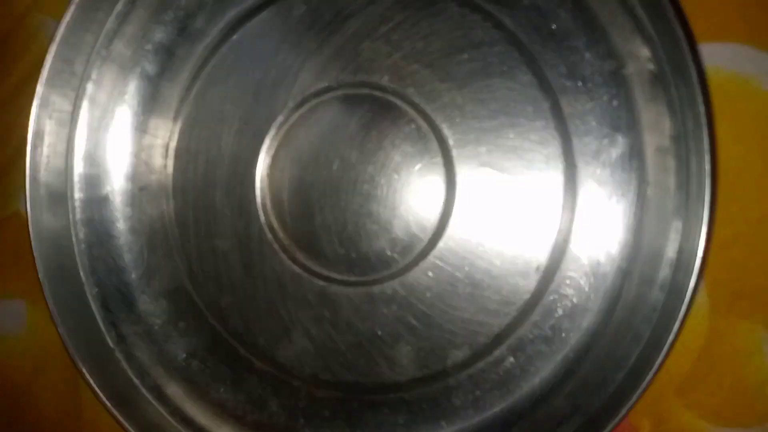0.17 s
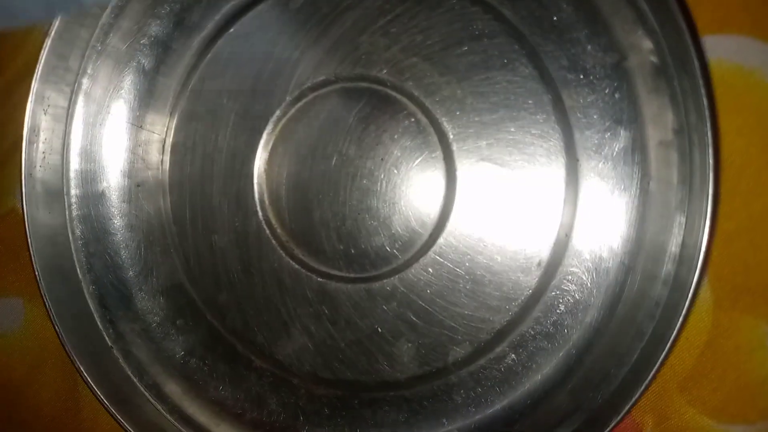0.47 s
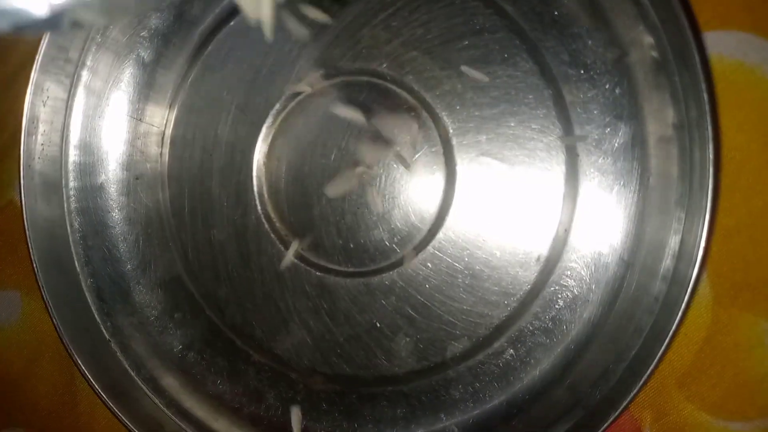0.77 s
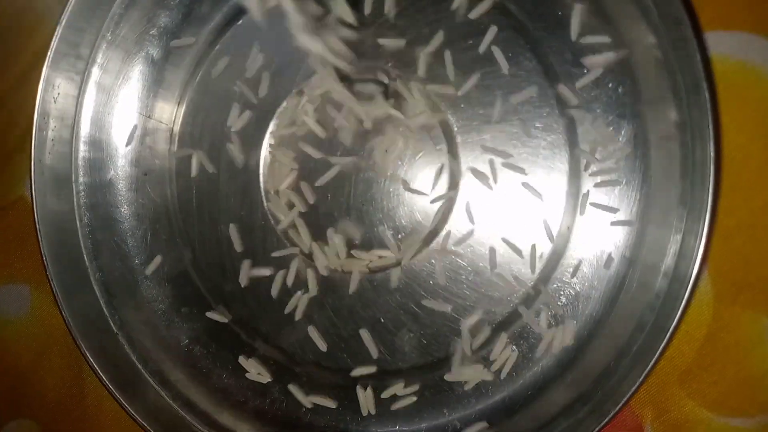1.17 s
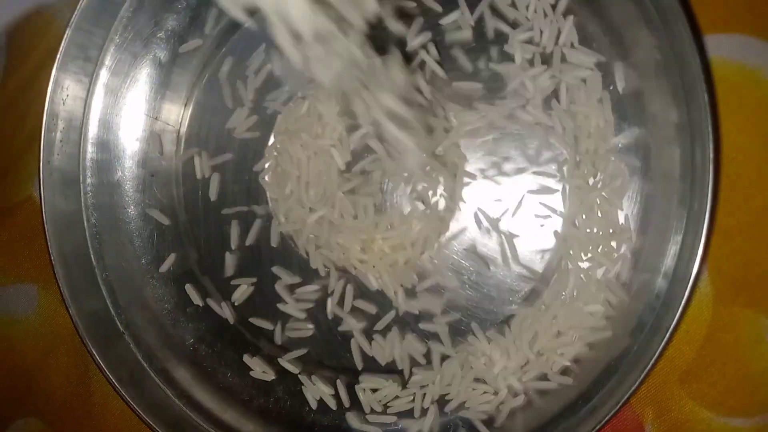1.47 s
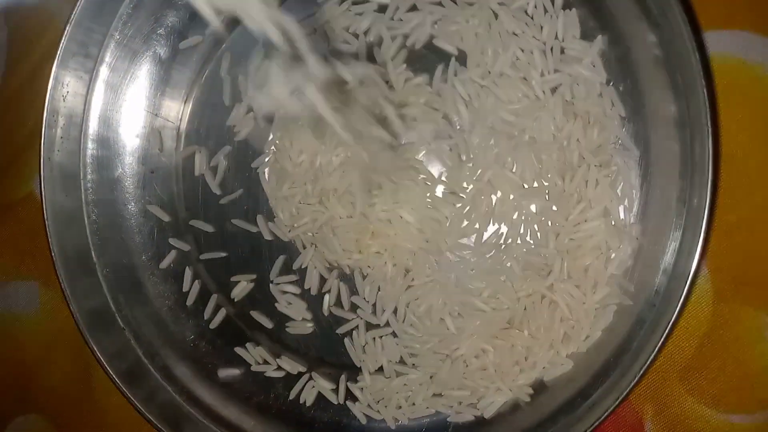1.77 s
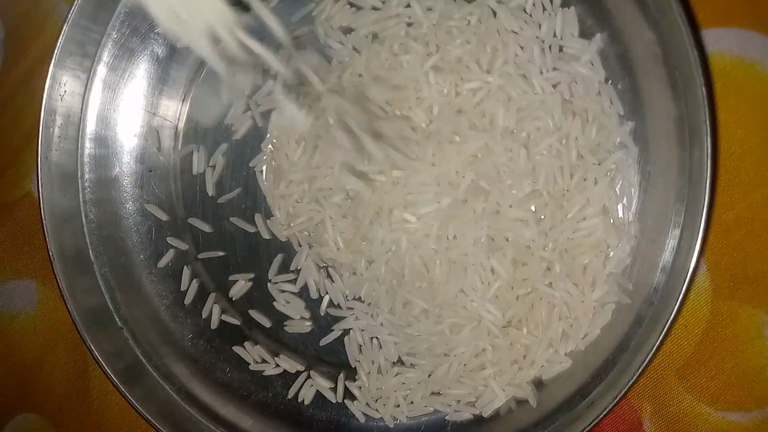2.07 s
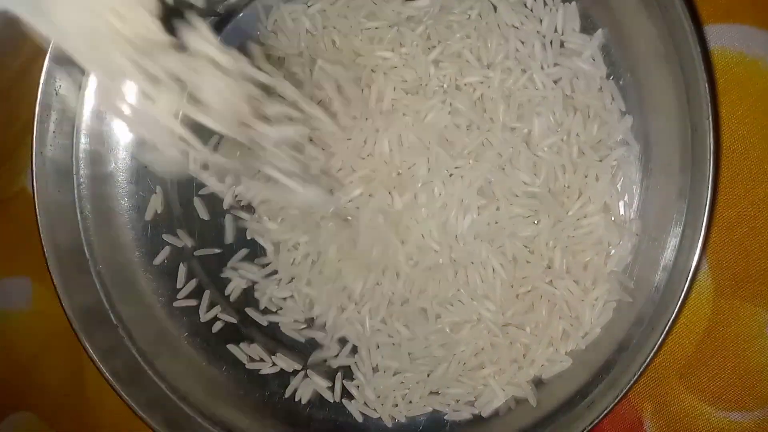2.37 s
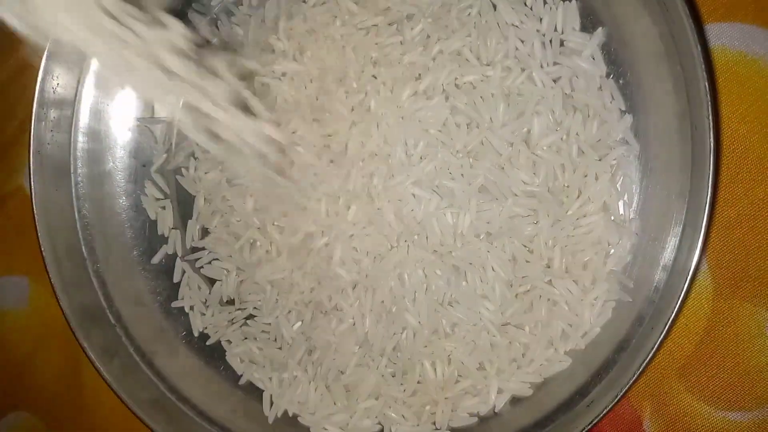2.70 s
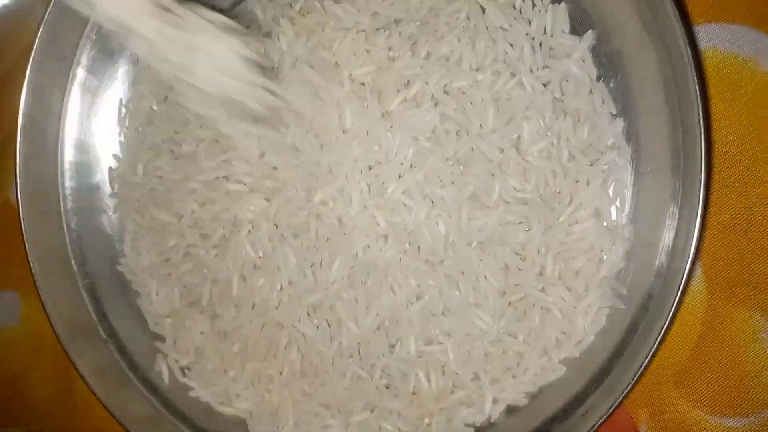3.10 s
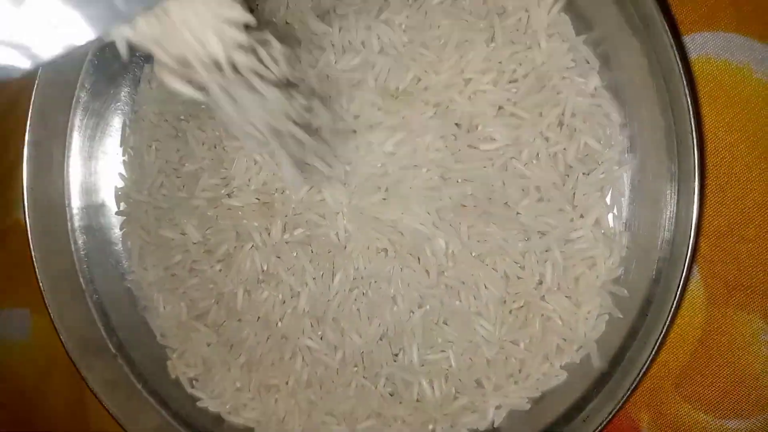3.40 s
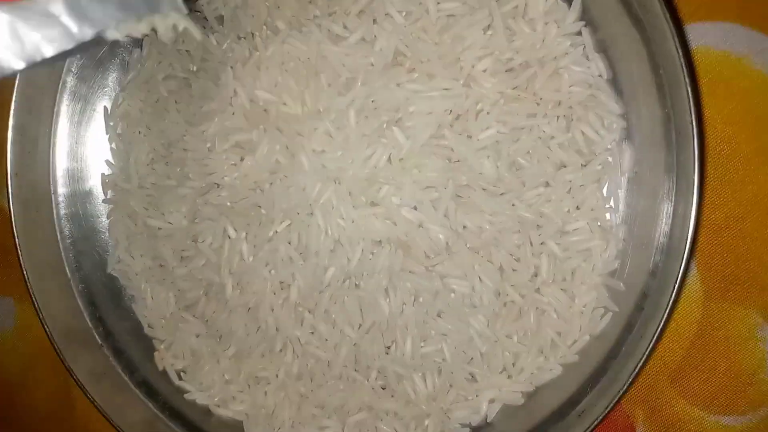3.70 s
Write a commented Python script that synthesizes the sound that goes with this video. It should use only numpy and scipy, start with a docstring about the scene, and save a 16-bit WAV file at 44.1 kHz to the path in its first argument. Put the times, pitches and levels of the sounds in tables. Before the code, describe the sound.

Dry rice is poured into a steel bowl, close to a phone microphone indoors: a thin bag crackles first, grains tick and ring on bare metal, then a dense hissing patter on rice thins to a trickle.

```python
"""Indoors, close under a phone microphone: dry rice is tipped from a crackling bag into an empty steel bowl.
The bag and the grains are random impacts that shape noise bursts or excite ringing modes.
The first grains ring the bare steel; as the heap grows they patter on rice, and strays ring the rim.
A few hollow low bumps from handling are decaying sines, over a faint room rumble of wavering noise."""
import sys
import numpy as np
from scipy import signal
from scipy.fft import rfft, irfft
from scipy.io import wavfile
from scipy.ndimage import uniform_filter1d

SR = 44100
rng = np.random.default_rng(int(sys.argv[2]) if len(sys.argv) > 2 else 0)


def dump_mix(stems):
    """Bounce the given channels to the path in sys.argv[1] as a 16-bit WAV at rate SR."""
    frames = np.atleast_2d(stems).T  # one column per channel
    limited = np.clip(frames, -1, 1)  # hard clip at full scale
    pcm = np.round(limited * 32767).astype(np.int16)
    wavfile.write(sys.argv[1], SR, pcm)


def volts_from_db(level):
    """Convert decibel levels to linear amplitude ratios."""
    exponent = np.asarray(level, float) / 20
    return 10 ** exponent


N = 169785  # samples


def track(rows, fade_s=0.017):
    """Gain along (time [s], level [dB]) rows, fading out beyond both ends."""
    t, db = np.array(rows, float).T
    times = np.r_[t[0] - fade_s, t, t[-1] + fade_s]
    levels = np.r_[-120, db, -120]
    return volts_from_db(np.interp(np.arange(N) / SR, times, levels))


def unit(x):
    """Scale to rms 1."""
    return x / np.sqrt(np.mean(x ** 2))


def colour(x, points):
    """Shape a spectrum by (frequency [Hz], level [dB]) points, then scale to rms 1."""
    hz, db = np.array(points, float).T
    f = np.arange(len(x) // 2 + 1) * SR / len(x) + 1  # + 1 avoids log(0)
    gain = volts_from_db(np.interp(np.log(f), np.log(hz), db))
    return unit(irfft(rfft(x) * gain, len(x)))


def walk(rate):
    """Slewed random levels of rms 1, with rate [1/s] new values."""
    k = int(SR / rate)
    steps = np.repeat(rng.standard_normal(N // k + 1), k)[:N]
    return unit(uniform_filter1d(steps, k))


# the stream thins with this time constant to this share of its grains
TRICKLE_FROM_S, TRICKLE_S, TRICKLE_SHARE = 3.52, 0.12, 0.25


def stream(time_s):
    """1 while the rice flows fully, then falling away exponentially."""
    return np.exp(-np.maximum(np.arange(N) / SR - TRICKLE_FROM_S, 0) / time_s)


def impacts(rate, spread_db, clump_db, clump_rate):
    """Random impacts, rate [1/s] in full flow: many small, few large, in clumps; fewer in the trickle."""
    chance = rng.random((2, N))
    clumps = walk(clump_rate)
    clumps = clumps - uniform_filter1d(clumps, SR // 10)  # only the quick bunching
    size_db = np.minimum(-spread_db * np.log(1 - chance[1]), 4 * spread_db)
    size = volts_from_db(size_db + clump_db * clumps)
    flow = np.maximum(stream(TRICKLE_S), TRICKLE_SHARE)
    return (chance[0] < rate / SR * flow) * size


def patter(hits, tail_s, points):
    """Each impact is a short burst of noise that swells and dies."""
    pole = np.exp(-2 / (tail_s * SR))
    power = signal.lfilter([1], [1, -2 * pole, pole ** 2], hits ** 2 + 1e-30)
    return colour(np.sqrt(np.abs(power)) * rng.standard_normal(N), points)


def ring(x, hz, width_hz):
    """One mode as a complex resonator; a unit impulse rings with peak near 1."""
    pole = np.exp((2j * hz - width_hz) * np.pi / SR)
    return signal.lfilter([1], [1, -pole], x + 1e-18).imag


def steel(hits, modes):
    """Every impact excites each (Hz, width [Hz], dB) mode by its own chance amount."""
    return sum(volts_from_db(db) * np.sqrt(width_hz) * ring(hits * rng.standard_normal(N), hz, width_hz)
               for hz, width_hz, db in modes)


def snaps(rows, tail_s, width, edge_db, points):
    """Single snaps: a ringing centre, its width a share of its frequency, plus a broad edge."""
    out, lead = np.zeros(N), 32  # lead [samples] leaves room for the edge's spread ahead of the snap
    t = (np.arange(1024) - lead) / SR
    for (s, db, hz), noise in zip(rows, rng.standard_normal((len(rows), len(t)))):
        push = np.diff(noise * np.exp(-t / tail_s) * (t >= 0), prepend=0)
        centre = unit(ring(push, hz, width * hz))
        burst = centre + volts_from_db(edge_db) * colour(push, points)
        burst = volts_from_db(db) * burst / np.abs(burst).max()
        i = int(s * SR) - lead
        out[i:i + len(t)] += burst[:N - i]
    return out


def room_tail(near):
    """The room answers the close sounds with noise that decays by 60 dB in 0.12 s."""
    t = np.arange(8192) / SR
    tail = rng.standard_normal(len(t)) * np.exp(-np.log(1000) * t / 0.12) * (t > 0.002)
    return signal.fftconvolve(near, tail / np.sqrt(np.sum(tail ** 2)))[:N]


# low rumble of room and handling before it wavers: (time [s], level [dB])
RUMBLE_LEVEL = [(0.06, -59), (0.8, -63), (1.5, -70), (2.2, -50.5), (3.55, -59), (3.85, -63)]
# its spectrum: (frequency [Hz], relative density [dB per Hz])
ROOM_COLOUR = [(40, -36), (125, -9.5), (200, -2.5), (290, 4.5), (400, -0.5), (520, -20), (1000, -43)]
# deepest rumble before it wavers: (time [s], level [dB])
DEEP_LEVEL = [(0.1, -68), (1.45, -84.5), (2.2, -71), (3.85, -73)]


def rumble():
    """Low room and handling noise that wavers; its deepest part, a noise-fed resonance, comes in puffs."""
    low = track(RUMBLE_LEVEL) * volts_from_db(-2.0 + 2.5 * walk(14.0))
    low = low * colour(rng.standard_normal(N), ROOM_COLOUR)
    puffs = track(DEEP_LEVEL) * volts_from_db(5.4 * walk(18.0))
    deep = unit(ring(ring(rng.standard_normal(N), 82.0, 36.0), 82.0, 36.0))
    return low + puffs * deep


# handling bumps: (time [s], level before swell and decay [dB], frequency [Hz], 60 dB decay time [s])
BUMPS = [(0.26, -21, 760, 0.013), (0.285, -45, 65, .2), (0.39, -39, 80.6, 0.12), (0.52, -48, 200, 0.34),
         (0.565, -38.5, 204, 0.22), (0.633, -15.5, 680, 0.0085), (0.67, -47, 197, 0.51),
         (1.066, -46, 180, 0.375), (1.218, -24.5, 476, 0.012), (2.02, -48.5, 191.3, 0.49),
         (2.235, -47, 75, .2), (2.902, -31, 286, 0.19)]


def bumps():
    """Soft pushes into hollow low resonances: sines that swell quickly and decay."""
    out = np.zeros(N)
    for s, db, hz, t60 in BUMPS:
        t = np.maximum(np.arange(N) / SR - s, 0)
        swell = 1 - np.exp(-2 * t * hz)
        decay = np.exp(-np.log(1000) * t / t60)
        out += volts_from_db(db) * swell * decay * np.sin(2 * np.pi * hz * t)
    return out


# rustle of the bag: (time [s], level [dB])
BAG_LEVEL = [(0.045, -52), (0.07, -41), (0.14, -36), (0.22, -26), (0.3, -31), (0.435, -31), (0.51, -26),
             (0.55, -31.5), (0.595, -25), (0.645, -29.5), (0.74, -25.5), (0.83, -28), (0.93, -31.5),
             (1.02, -42.5)]
# spectrum of the bag's rustle as the phone microphone hears it, with the microphone's resonance
# near 15 kHz: (frequency [Hz], relative density [dB per Hz])
BAG_COLOUR = [(200, -20), (540, -21.5), (1500, -13), (3200, -6.5), (3750, -2.5), (4250, -2.5), (4900, -7),
              (6300, -7.5), (8500, -19), (12500, -33.5), (15000, -22), (15900, -38)]
# loudest crackles of the bag: (time [s], peak level [dB], centre frequency [Hz])
CRACKLES = [(0.149, -14.5, 6130), (0.216, -19, 4500), (0.261, -11, 4000), (0.272, -9.5, 3800),
            (0.287, -14.5, 3050), (0.329, -10.5, 4400), (0.354, -11.5, 4260), (0.363, -15, 4300),
            (0.382, -10, 5900), (0.423, -8, 2700), (0.533, -16, 3960), (0.612, -14, 4200),
            (0.635, -7.5, 6860)]


def bag():
    """Thin film rustles and crackles as it tips."""
    hits = impacts(3000.0, spread_db=3.2, clump_db=1.8, clump_rate=70.0)
    rustle = track(BAG_LEVEL) * patter(hits, 0.0004, BAG_COLOUR)
    return rustle + snaps(CRACKLES, 0.00038, 0.16, edge_db=2, points=BAG_COLOUR)


# modes of the bare rim, the last two high: (frequency [Hz], width [Hz], relative level [dB])
RIM_MODES = [(6625, 50, 0), (6980, 65, -6), (7270, 75, -3), (7620, 60, -5), (7960, 50, -14),
             (14910, 80, -9), (15680, 100, -15)]
# spills on the rim: (time [s], drive level [dB], time to peak [s], extra drive of the high modes [dB])
RIM_SPILLS = [(2.847, -24.5, 0.0021, 7), (2.961, -31.5, 0.02, 10), (3.019, -26.5, .003, -8),
              (3.044, -32.5, 0.013, -2), (3.137, -25, 0.0091, 0), (3.47, -37, .002, 23),
              (3.57, -45, 0.0046, 25), (3.666, -34, 0.0065, 4)]


def rim():
    """Short spills of grains reach the bare rim and ring it."""
    t, low, high = np.arange(N) / SR, 0, 0
    for s, db, rise_s, high_db in RIM_SPILLS:
        age = np.maximum(t - s, 0) / rise_s
        spill = volts_from_db(db) * age * np.exp(1 - age)
        low = low + spill
        high = high + spill * volts_from_db(high_db)
    grains = impacts(4000.0, spread_db=1.5, clump_db=0.5, clump_rate=90.0) / np.sqrt(SR / 100)
    return steel(low * grains, RIM_MODES[:5]) + steel(high * grains, RIM_MODES[5:])


# grains landing on the heap: (time [s], level [dB])
HEAP_LEVEL = [(0.9, -45), (1.1, -35), (1.6, -39.5), (2.05, -32.5), (2.2, -30), (2.45, -29), (2.7, -32),
              (2.85, -34.5), (2.93, -32), (3.1, -35.5), (3.3, -31.5), (3.45, -28), (3.55, -36.5),
              (3.65, -37), (3.85, -36.5)]
# spectrum of grain on grain through the phone microphone, which resonates near 15 kHz:
# (frequency [Hz], relative density [dB per Hz])
RICE_COLOUR = [(250, -20.5), (450, -16.5), (1170, -11.5), (1530, -8), (3280, -2.5), (4200, -2), (7000, -9),
               (10000, -28), (13300, -27), (14800, -14.5), (15900, -22.5)]
# single grains on the heap: (time [s], peak level [dB], centre frequency [Hz])
SINGLE_GRAINS = [(1.224, -28, 1440), (3.175, -18, 4080), (3.401, -14, 3450), (3.417, -16, 3980),
                 (3.441, -12, 4020), (3.747, -25, 2830), (3.754, -25.5, 1640), (3.797, -27.5, 4500),
                 (3.841, -22, 1650)]
HEAP_THUD_BELOW_HZ = 750  # only a full stream pushes the heap hard enough to sound below this


def heap():
    """Grains patter on grains; the low thud fades faster than the stream thins."""
    hits = impacts(1800.0, spread_db=2.0, clump_db=1.5, clump_rate=55.0)
    grains = patter(hits, 0.0016, RICE_COLOUR)
    high_pass = signal.butter(4, HEAP_THUD_BELOW_HZ, "high", fs=SR, output="sos")
    ticks = signal.sosfiltfilt(high_pass, grains)
    thud = stream(TRICKLE_S / 2) * (grains - ticks)
    singles = snaps(SINGLE_GRAINS, 0.00054, 0.21, edge_db=-8.0, points=RICE_COLOUR)
    return track(HEAP_LEVEL) * (ticks + thud) + singles


# grains landing on the bare floor of the bowl: (time [s], drive level [dB])
FLOOR_DRIVE = [(0.69, -43), (0.7, -33), (0.735, -43), (0.757, -30), (0.78, -31), (0.835, -38.5),
               (0.848, -24), (0.88, -36), (0.895, -28), (0.935, -31), (1.0, -27), (1.6, -27.5),
               (1.9, -29.5), (2.1, -35.5), (2.5, -31), (2.7, -36.5), (3.5, -45), (3.77, -43.5)]
# modes of the bowl floor: (frequency [Hz], relative level [dB])
FLOOR_MODES = [(3300, -9), (5245, -5), (6170, 0), (6330, 0), (6620, -8), (7000, -4), (7110, -1), (7275, -3),
               (7460, -5), (7640, -1), (7940, -3), (8310, -7), (8695, -7), (8980, -6), (9870, -11),
               (10290, -12), (10640, -13), (11300, -14), (13800, -12), (14300, -8), (14720, -5), (15105, 0),
               (15340, -3), (15680, -1)]
# spectrum of the tick on steel as the phone microphone hears it, with the microphone's resonance
# near 15 kHz: (frequency [Hz], relative density [dB per Hz])
STEEL_TICK = [(1000, -35.5), (2000, -19.5), (5700, -15), (6200, -10.5), (7900, -7), (8500, -11.5),
              (12000, -17), (14000, -11.5), (15300, 1.5), (15900, -37)]
FLOOR_WIDTH_HZ = 77  # shared by all floor modes
# rice covers the middle of the bowl and damps its lower modes
COVERED_FROM_S, COVER_DB_PER_S, COVERED_BELOW_HZ = 1.42, -21, 6500


def bowl_floor():
    """Grains tick on bare steel and set its modes ringing."""
    drive = track(FLOOR_DRIVE)
    hits = impacts(2500.0, spread_db=3.0, clump_db=2.0, clump_rate=70.0) * drive
    cover = volts_from_db(COVER_DB_PER_S * np.maximum(np.arange(N) / SR - COVERED_FROM_S, 0))
    modes = 0
    for hz, db in FLOOR_MODES:
        push = hits * cover if hz < COVERED_BELOW_HZ else hits
        modes = modes + steel(push, [(hz, FLOOR_WIDTH_HZ, db)])
    ticks = patter(hits, 0.0012, STEEL_TICK)
    level = np.sqrt(np.mean(drive ** 2))
    return level * (volts_from_db(2.0) * unit(modes) + volts_from_db(-0.5) * ticks)


def scene():
    """All sources, with a short room tail on the bag and the grains."""
    close = bag() + bowl_floor() + heap() + rim()
    near = signal.sosfilt(signal.butter(2, 200, "high", fs=SR, output="sos"), close)
    return (near + volts_from_db(-12) * room_tail(near) + bumps() + rumble())[None]


def roll_off(x):
    """The treble ends steeply here."""
    return signal.sosfilt(signal.butter(12, 16840, fs=SR, output="sos"), x)


def record(dry):
    """The phone cuts the top steeply above 15780 Hz."""
    low_pass = signal.ellip(12, 0.5, 85, 15780, fs=SR, output="sos")  # ripple 0.5 dB, stop band -85 dB
    mix = signal.sosfilt(low_pass, dry)
    return roll_off(mix)


dry = scene()
out = record(dry)
dump_mix(out)
```